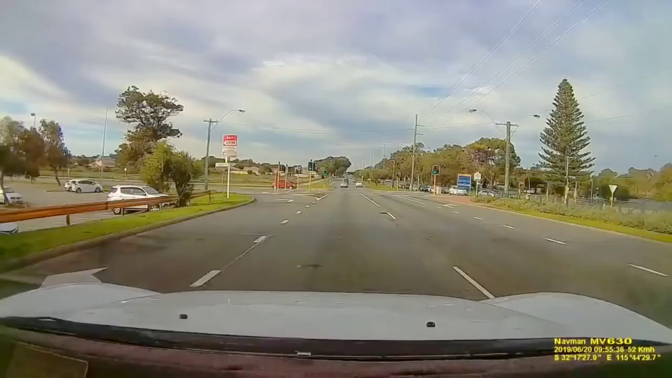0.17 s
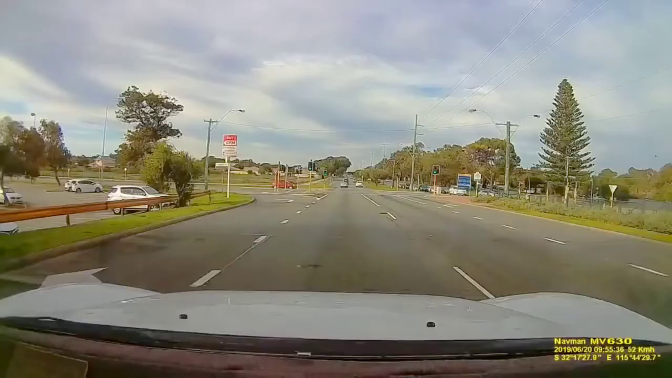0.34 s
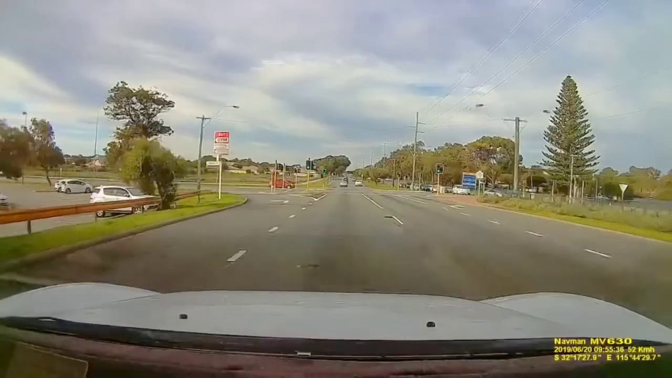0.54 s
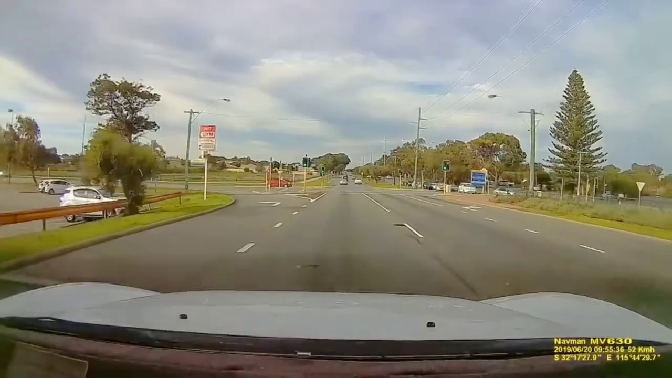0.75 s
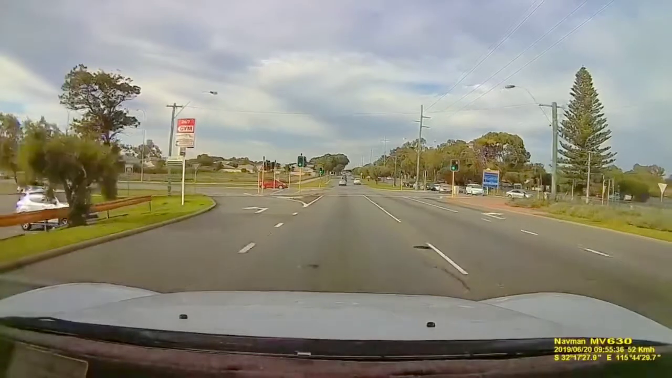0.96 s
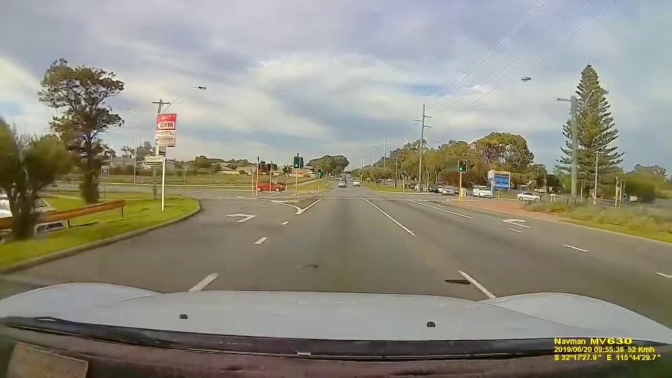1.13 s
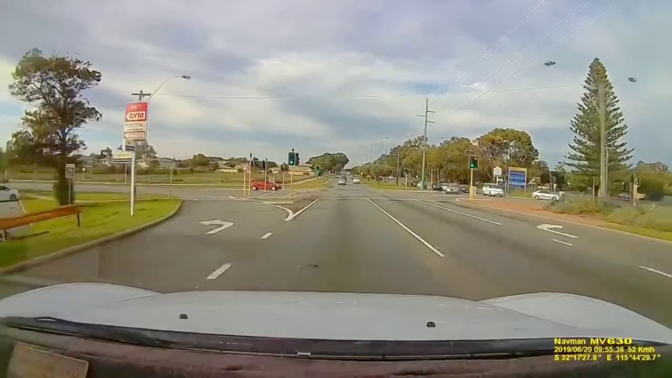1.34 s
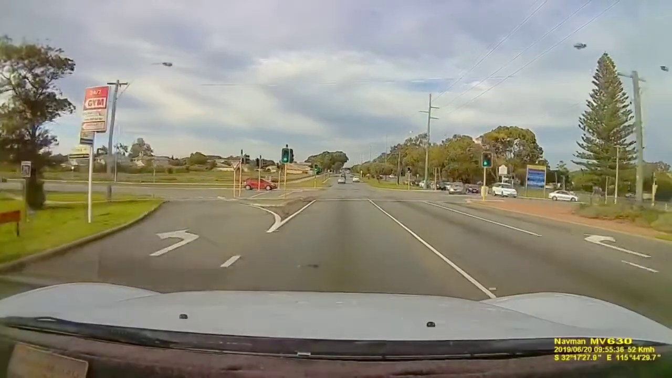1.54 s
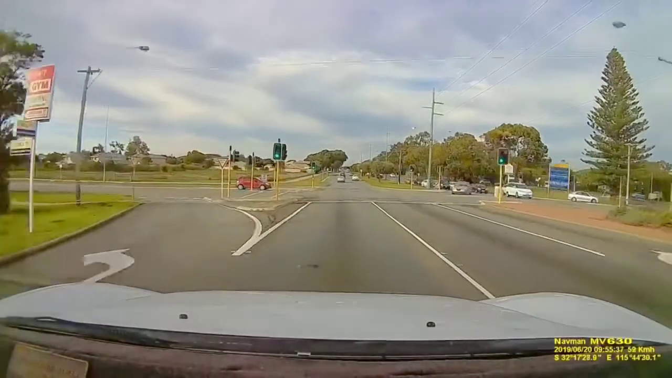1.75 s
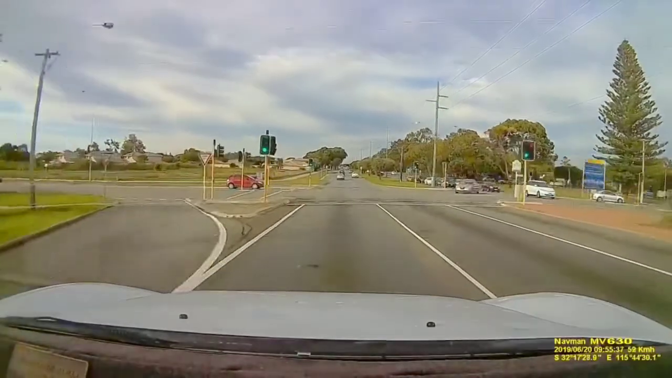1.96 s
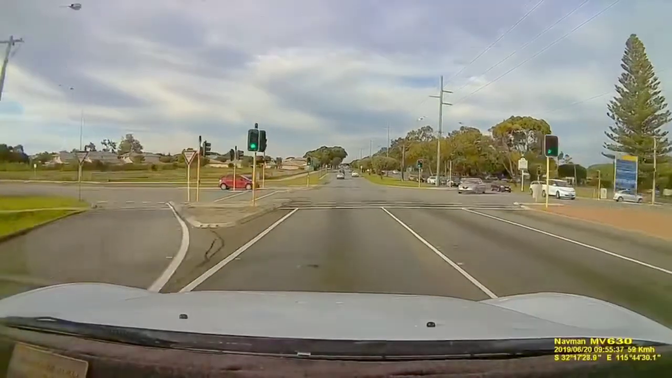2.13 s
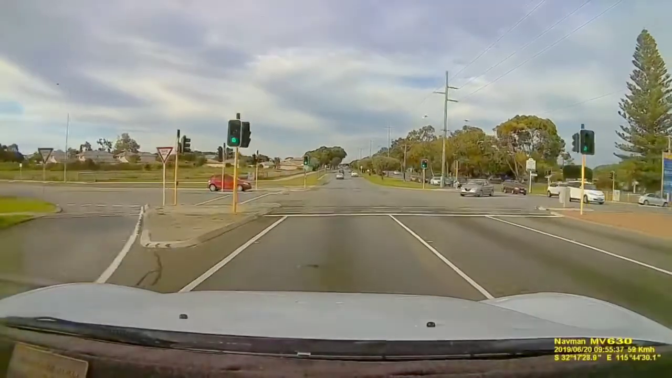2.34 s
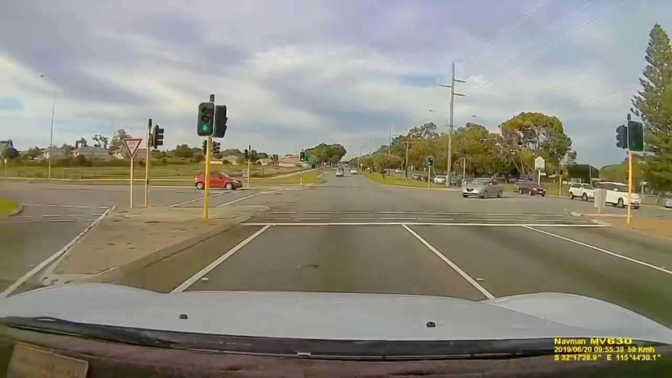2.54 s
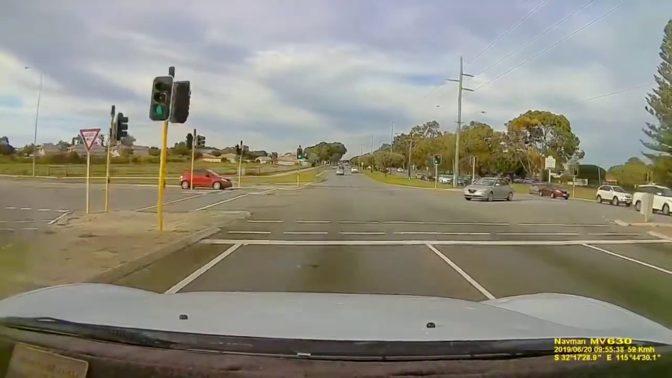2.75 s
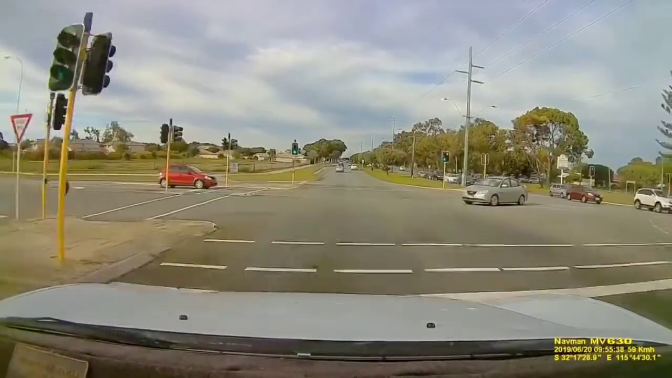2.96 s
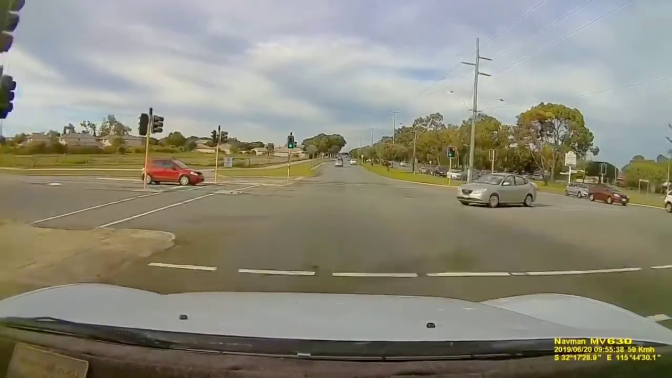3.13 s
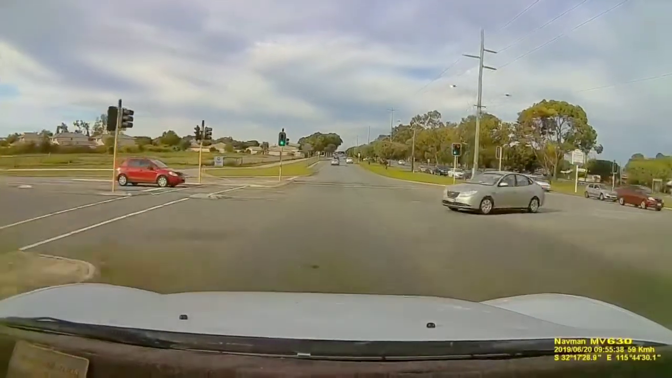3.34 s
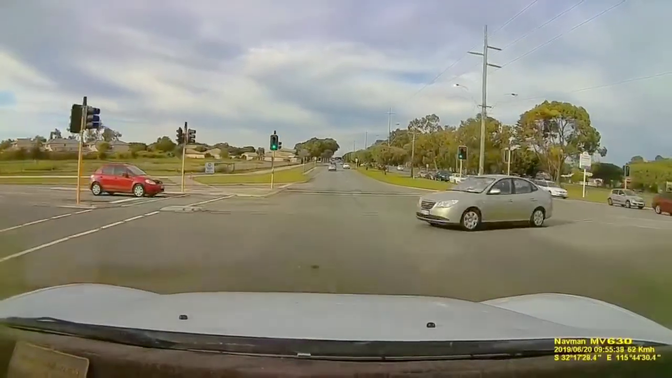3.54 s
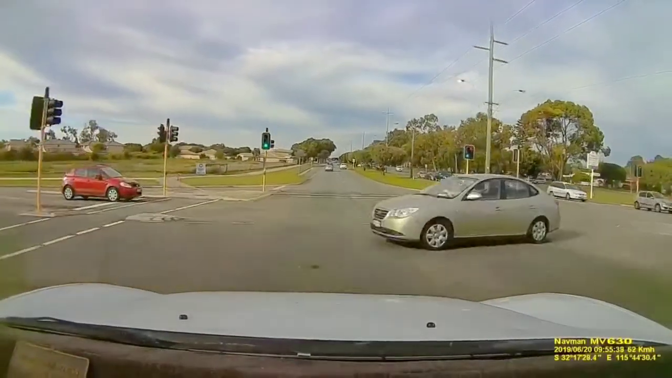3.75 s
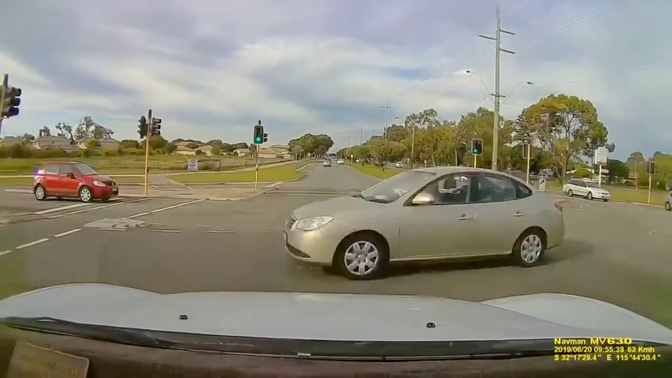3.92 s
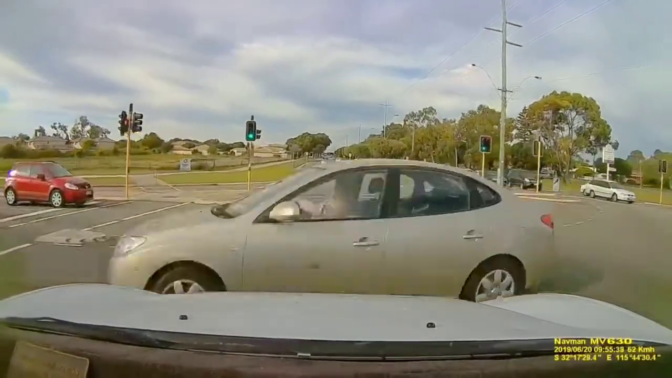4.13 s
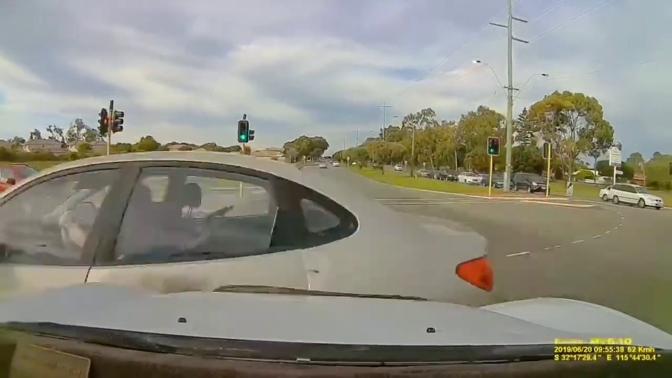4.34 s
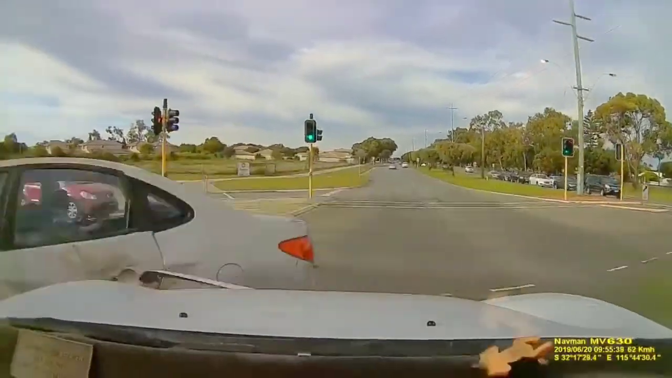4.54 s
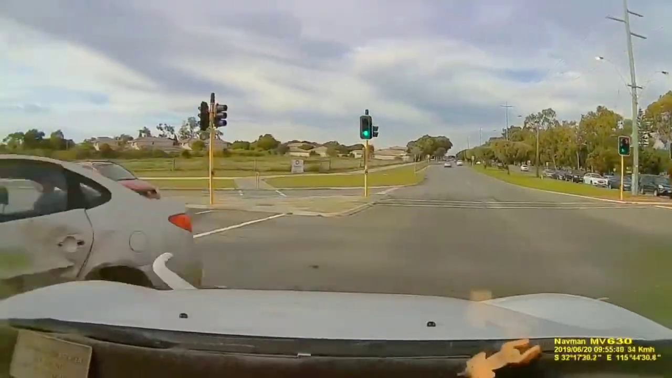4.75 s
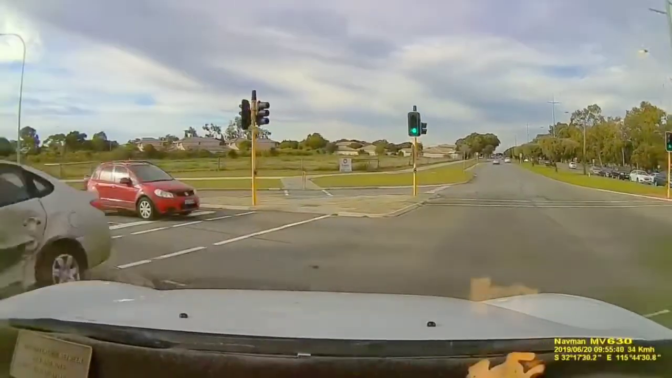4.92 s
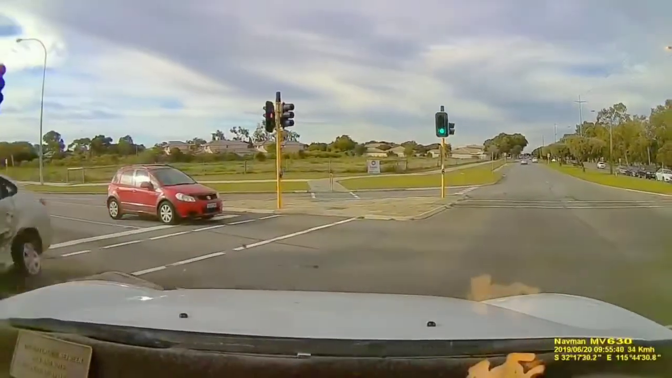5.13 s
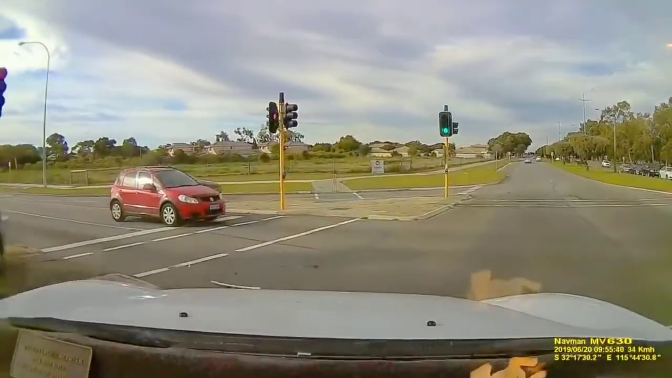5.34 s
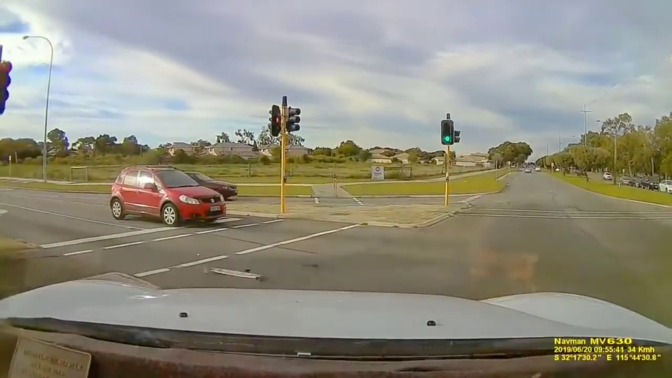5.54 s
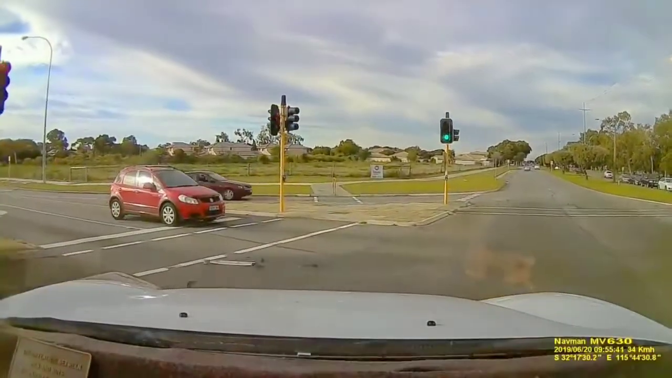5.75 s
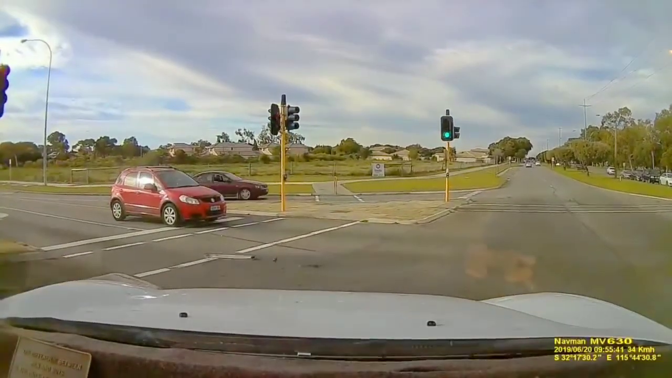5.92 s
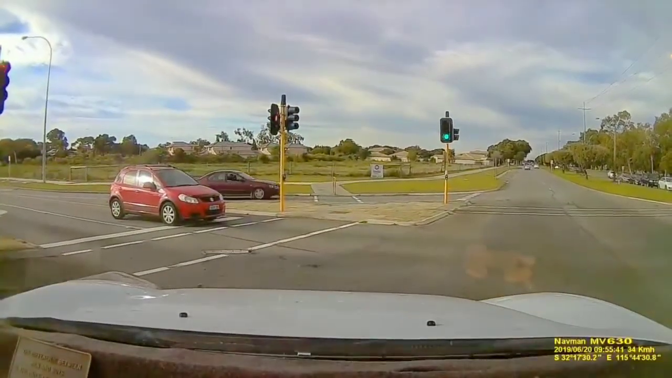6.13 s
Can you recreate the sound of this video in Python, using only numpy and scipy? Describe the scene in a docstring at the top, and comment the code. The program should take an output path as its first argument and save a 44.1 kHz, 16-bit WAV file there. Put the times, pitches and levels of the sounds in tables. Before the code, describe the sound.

Inside a moving car, muffled road roar turns into juddering, squealing braking, then a violent crash with crunching panels and loose parts rattling to a stop.

```python
"""Hard braking and a car crash, from inside

A small microphone at the windscreen hears tyres roar on the road; the car brakes hard, shudders and skids.
It hits another car: panels crunch and loose things knock about the cabin as it rolls to a stop.
Filtered noise makes the road and wreck, unsteady sines the squeal, bursts of tiny contacts the blows.
In set spells the overloaded microphone all but cuts out; jolts of the body free it."""
import sys
import numpy as np
from scipy import signal
from scipy.fft import rfft, irfft, next_fast_len
from scipy.io import wavfile
from scipy.ndimage import uniform_filter1d, map_coordinates

SR = 44100
rng = np.random.default_rng(int(sys.argv[2]) if len(sys.argv) > 2 else 0)


def waveform_to_disk(signal):
    """Save audio, clipped to [-1, 1], as 16-bit WAV at the path in sys.argv[1]."""
    frames = np.transpose(np.atleast_2d(signal))
    scaled = np.clip(frames, -1, 1) * 32767
    samples = np.round(scaled).astype(np.int16)
    wavfile.write(sys.argv[1], SR, samples)


N = 272641
IMPACT = 4.47  # s, the collision


def amp(db):
    """Amplitude for a level in dB."""
    return 10 ** (np.asarray(db) / 20)


def unit(x):
    """x at rms 1."""
    return x / np.sqrt(np.mean(x ** 2) + 1e-20)


def clock():
    """Time of each sample in seconds."""
    return np.arange(N) / SR


def after(s, rise):
    """A fade from 0 to 1 over rise seconds, half open at s."""
    return np.clip((clock() - s) / rise + .5, 0, 1)


def between(start, end, rise, fall):
    """A switch that is open from start to end."""
    return after(start, rise) * (1 - after(end, fall))


def wobble(rate):
    """A smooth random curve, rate knots a second."""
    knots = rng.standard_normal(int(N * rate / SR) + 4)
    return map_coordinates(knots, [clock() * rate])


def shape(points, hz):
    """Gain read from a spectrum table, on a log frequency axis."""
    f, db = np.transpose(points)
    return amp(np.interp(np.log(hz + 1), np.log(f + 1), db))


def resonances(modes, hz):
    """Summed peaks of (f/Hz, width/Hz, level/dB) modes."""
    return sum(amp(db) / np.hypot(1, 2 * (hz - f) / width) for f, width, db in modes)


def filtered(x, gain):
    """x through the causal, minimum-phase filter that has this gain over frequency."""
    m = 2 * next_fast_len(len(x) // 2 + 4096)
    log_gain = np.log(np.maximum(gain(np.fft.rfftfreq(m, 1 / SR)), 1e-6))
    # folding the cepstrum onto positive time makes the filter causal
    cepstrum = irfft(log_gain, m)
    cepstrum[1:m // 2] *= 2
    cepstrum[m // 2 + 1:] = 0
    response = np.exp(rfft(cepstrum))
    return irfft(rfft(x, m) * response, m)[:len(x)]


def coloured(x, points):
    """x with this spectrum, at rms 1."""
    return unit(filtered(x, lambda hz: shape(points, hz)))


def noise(points):
    """Steady noise with this spectrum, for the whole scene."""
    return coloured(rng.standard_normal(N), points)


def contacts(size, rate, rub):
    """Tiny impacts of uneven force, on average rate a second, over a share of rubbing noise."""
    ticks = (rng.random(size) < rate / SR) * rng.standard_normal(size)
    return unit(ticks) + rub * rng.standard_normal(size)


def cabin(x, wet=0.6, t60=0.1):
    """Glass and dashboard answer with a short, dense tail."""
    t = np.arange(SR // 10) / SR
    tail = rng.standard_normal(len(t)) * amp(-60 * t / t60)
    reflected = signal.fftconvolve(x, tail / np.linalg.norm(tail))[:len(x)]
    return unit(x + wet * reflected)


# How fast shaking builds up in the rumble, roar or clatter, and buzz layers: [dB/s] each
BUILD_DB_PER_S = (88, 91, 46.5)


def shaking(rows):
    """Gains of the low, middle and buzzing layers: each bout builds up, holds and falls away."""
    t, power = clock(), np.zeros((3, N))
    for s, hold, fall, *levels_db in rows:
        early, late = np.maximum(s - t, 0), np.maximum(t - s - hold, 0)
        for layer, (db, build) in enumerate(zip(levels_db, BUILD_DB_PER_S)):
            power[layer] += amp(db - build * early - fall * late) ** 2
    return np.sqrt(power)


# Airy hiss spectrum: f/Hz, level/dB [dB per Hz]
HISS = [(200, -20), (3000, -3), (7000, -5), (13000, -5)]


def microphone_hiss(level_db=-74):
    """The microphone's own faint, steady noise."""
    return amp(level_db) * noise(HISS)


# Shudders over a rough patch, then under braking:
# t/s, hold/s, fall/(dB/s), rumble level/dB, roar level/dB, buzz level/dB
SHUDDERS = [(2.77, 0.063, 112, -29, -48, -60.5), (3.38, 0.16, 133, -19, -24.5, -41),
            (3.67, 0.019, 100, -22, -30, -46), (3.83, 0.04, 78, -28.5, -35, -54.5),
            (4.39, 0.065, 60, -32.5, -39, -70)]


def shudders():
    """The car shakes over a rough patch, then in bouts under braking."""
    return shaking(SHUDDERS)


# Suspension rumble spectrum: f/Hz, level/dB [dB per Hz]
RUMBLE = [(20, -2), (48, 8.5), (75, -5.5), (118, 2.5), (150, 0.5), (190, 1), (340, -3), (440, -25),
          (750, -101.5)]
# Tyre tread roar spectrum: f/Hz, level/dB [dB per Hz]
ROAR = [(180, -24), (300, -10), (346, -1.5), (387, -10.5), (427, 2), (545, -6.5), (615, -6), (672, -4),
        (1140, -5), (1230, -8.5), (1740, -17.5), (2310, -32.5), (2530, -29), (3290, -44), (4200, -52.5),
        (5460, -83), (9240, -120)]
# Cabin drone and a faint electrical whine: f/Hz, level/dB
TONES = [(48.4, -74), (118.4, -48), (425.3, -56), (624.5, -50), (8516, -84)]
# Cruising levels at time zero, and their steady growth
RUMBLE_DB, ROAR_DB, AIR_DB, GAIN_DB_PER_S = -35, -36.5, -69.5, 1.0
# The wheels lock, and the rolling noise drops
LOCK_S, LOCK_TAKES_S, RUMBLE_DROP_DB, ROAR_DROP_DB = 3.28, 1, -6.5, -7.5


def road(shaken_rumble, shaken_roar):
    """Suspension rumble, tread roar, rushing air and cabin drone, up to the collision."""
    growth_db, locked = GAIN_DB_PER_S * clock(), after(LOCK_S, LOCK_TAKES_S)
    bounce = np.hypot(amp(RUMBLE_DB + growth_db + RUMBLE_DROP_DB * locked), shaken_rumble)
    tread = np.hypot(amp(ROAR_DB + growth_db + ROAR_DROP_DB * locked), shaken_roar)
    rumble = bounce * unit(amp(1.2 * wobble(24.76)) * noise(RUMBLE))
    roar = tread * amp(0.46 * wobble(14)) * noise(ROAR)
    air = amp(AIR_DB + growth_db) * noise(HISS)
    drone = np.zeros(N)
    for hz, db in TONES:
        phase = 2 * np.pi * hz * clock() + 0.76 * wobble(6.6)
        drone += amp(db) * np.sqrt(2) * np.sin(phase)
    return (rumble + roar + air + drone) * (1 - after(IMPACT, 0.016))


# Short squeaks and tyre chirps:
# t/s, length/s, f/Hz, glide/octaves, roughness [share of pitch], level/dB [at the peak of the swell]
SQUEAKS = [(3.152, 0.018, 4840, 0, 0.025, -49.5), (3.214, 0.013, 4850, -0.11, 0.019, -46),
           (3.301, .088, 1450, 0.5, 0.045, -20.5), (3.44, 0.035, 1975, 0.23, 0.088, -32.5),
           (3.519, 0.059, 1366, 0.02, 0.047, -21), (3.652, 0.015, 2480, -0.013, 0.052, -19.5),
           (3.822, 0.024, 2510, 0.08, 0.03, -34), (4.426, 0.037, 1620, .1, 0.04, -32.5),
           (5.572, 0.015, 2640, 0.18, 0.0495, -35)]


def squeaks():
    """Rubbing surfaces catch for a moment and sing on one rough, gliding note."""
    out, waver = np.zeros(N), wobble(600)
    for s, length, hz, glide, rough, db in SQUEAKS:
        progress = np.clip((clock() - s) / length, 0, 1)
        pitch = hz * 2 ** (glide * (progress - .5)) * (1 + rough * waver)
        swell = np.sin(np.pi * progress)
        out += amp(db) * np.sqrt(2) * swell * np.sin(2 * np.pi * np.cumsum(pitch) / SR)
    return out


# Rubber scrub spectrum: f/Hz, level/dB [dB per Hz]
SCRUB = [(410, -36.5), (700, -7), (854, -4), (949, -0.5), (1100, -2.5), (1320, -5), (1390, -3.5),
         (1600, -5), (1950, -22.5), (2590, -27.5), (3400, -40), (4420, -77), (7480, -120)]
# The slide keeps around one level and centre pitch until the collision
SKID_S, SKID_ATTACK_S, SKID_DB, SKID_HZ = 3.32, 0.17, -26.5, 1154


def skid(squeal=0.8, scrub=0.68, grit_db=-33):
    """Four tyres stick and slip at their own unsteady pitches, over rubber scrub and the hiss of grit."""
    tyres = np.zeros(N)
    for ratio in (.86, .96, 1.06, 1.18):
        hz = SKID_HZ * ratio * (1 + .04 * wobble(18) + .035 * wobble(220))
        tyres += amp(3.5 * wobble(35)) * np.sin(2 * np.pi * np.cumsum(hz) / SR)
    slide = squeal * unit(tyres) + scrub * noise(SCRUB)
    # grit level is relative to the skid
    grit = amp(grit_db + wobble(30)) * coloured(contacts(N, rate=2300, rub=0.72), HISS)
    return amp(SKID_DB) * (slide + grit) * between(SKID_S, IMPACT, SKID_ATTACK_S, 0.01)


# Broad crack spectrum of hard plastic: f/Hz, level/dB [dB per Hz]
CRACK = [(1060, -51), (1800, 1.5), (2040, -12.5), (2160, -5), (2370, -6.5), (2720, -2.5), (3080, -8.5),
         (3700, -12), (4400, -10.5), (4980, -16), (5730, -12.5), (7410, -21), (9810, -22), (10800, -21.5),
         (13000, -25.5)]
# Resonances of the plastic mount and trim: f/Hz, width/Hz, level/dB
TRIM = [(2134, 31, -2), (2850, 110, 3), (4530, 150, -10), (5740, 150, -19), (6750, 30, -5), (8700, 42, -14),
        (9500, 110, -6), (10780, 130, 1.5), (10500, 81, -14), (11500, 59, 5)]


def trim(x, ring=0.55):
    """Hard plastic: a broad crack with a few resonances standing out, answered by the cabin."""
    plastic = lambda hz: shape(CRACK, hz) * (1 + ring * resonances(TRIM, hz))
    return cabin(unit(filtered(x, plastic)))


# Rolling out: levels at the collision, and their common fade as the car slows
ROLL_BOOM_DB, ROLL_CLATTER_DB, ROLL_BUZZ_DB, ROLL_FADE_DB_PER_S = -33.5, -33, -49, 8.5


def rolling_out():
    """Gain that fades from the collision on."""
    return after(IMPACT, 0.017) * amp(-ROLL_FADE_DB_PER_S * np.maximum(clock() - IMPACT, 0))


def buzz(shaken, slide_db=-59):
    """Shaken trim chatters in clumps of contacts with single clinks; only a faint tremor fills the slide."""
    chatter = trim(contacts(N, rate=1500, rub=0.9) + .5 * contacts(N, rate=91, rub=0))
    clumps = amp(2.0 * wobble(45))
    sliding = amp(slide_db) * between(SKID_S, IMPACT, SKID_ATTACK_S, 0.015)
    tremor = sliding + amp(ROLL_BUZZ_DB) * rolling_out()
    return np.hypot(shaken, tremor) * clumps * chatter


# Heaves of the wreck after the collision, and again as it stops:
# t/s, hold/s, fall/(dB/s), boom level/dB, clatter level/dB, buzz level/dB
HEAVES = [(4.74, 0.13, 50, -23, -22, -33), (5.26, 0.086, 60, -35, -60, -68),
          (5.57, 0.083, 118, -30, -31.5, -43.5)]


def heaves():
    """The wreck heaves after the collision, and again as it stops."""
    return shaking(HEAVES) * after(IMPACT, 0.017)


# Spectra of the body's boom, its sway on the springs and broken parts: f/Hz, level/dB [dB per Hz]
BOOM = [(20, 3), (70, -4.5), (140, 8), (260, -4.5), (400, -6), (750, -40.5)]
SWAY = [(20, 7), (50, 14), (80, 2), (160, -53)]
CLATTER = [(150, -25.5), (250, 3.5), (301, -1), (387, -2), (537, 0.5), (555, -4), (605, 1.5), (661, -1),
           (698, 6), (753, -5), (1000, -0.5), (1480, -3.5), (1890, -28.5), (2820, -31), (3400, -42),
           (4420, -66), (7480, -120)]


def wreck(heaved_boom, heaved_clatter, sway_db=-24.5):
    """The body sways on its springs and booms; broken parts clatter as the car slows."""
    heave = np.hypot(heaved_boom, amp(ROLL_BOOM_DB) * rolling_out())
    scatter = np.hypot(heaved_clatter, amp(ROLL_CLATTER_DB) * rolling_out())
    lurch = amp(2.5 * wobble(25))
    pieces = contacts(N, rate=400, rub=.55)
    boom = heave * lurch * noise(BOOM)
    sway = amp(sway_db) * np.sqrt(heave) * noise(SWAY)  # dies away more slowly than the boom
    clatter = scatter * amp(1.1 * wobble(35)) * coloured(pieces, CLATTER)
    return (boom + sway + clatter) * after(IMPACT, 0.017)


def burst(x, length, t60):
    """The end of x at rms 1 while the contact lasts, then dying away."""
    t = np.arange(SR // 5) / SR
    envelope = amp(-60 * np.maximum(t - length, 0) / t60) * (1 - np.exp(-t / .0003))
    x = x[-len(t):] * envelope
    return x / np.sqrt(np.mean(x[t <= length + .001] ** 2))


# Spectra of the body's thud and the panels' knock: f/Hz, level/dB [dB per Hz]
THUD = [(25, 0), (70, -17.5), (140, 2), (300, -2), (420, -7), (800, -55)]
KNOCK = [(180, -15.5), (300, -1), (402, 0.5), (561, -2.5), (675, -1.5), (1120, -4.5), (1270, -11.5),
         (1440, -2), (1680, -15), (1900, -23), (2470, -66), (4180, -120)]
# Resonances of the body panels: f/Hz, width/Hz, level/dB
PANELS = [(344, 93, -3), (680, 30, -12), (960, 15, -5), (1063, 11, 3.5), (1322, 116, -3)]


def blows(rows, weight_db, thud_db_per_octave=-5, thud_t60=0.11, knock_t60=0.068, crack_t60=0.071,
          octaves=0.85, ring=2.05):
    """Crushing contacts knock panels, crack plastic and thud the body, more so for a low blow."""
    size = SR // 4  # the noise runs in before the part that burst() keeps
    out = np.zeros(N + SR)
    for s, length, db, knock_hz, crack_db in rows:
        # the place that is struck favours the panel resonances near one pitch
        place = lambda hz: np.exp(-(np.log2((hz + 1) / knock_hz) / octaves) ** 2 / 2)
        panel = lambda hz: shape(KNOCK, hz) * (1 + ring * resonances(PANELS, hz)) * place(hz)
        thud = burst(coloured(rng.standard_normal(size), THUD), length, thud_t60)
        knock = burst(filtered(contacts(size, rate=900, rub=.45), panel), length, knock_t60)
        crack = burst(trim(contacts(size, rate=800, rub=.55)), length, crack_t60)
        # thud level relative to the knock
        thud_db = weight_db + thud_db_per_octave * np.log2(knock_hz / 1000)
        blow = amp(db) * (knock + amp(thud_db) * thud) + amp(crack_db) * crack
        out[round(s * SR):][:len(blow)] += blow
    return out[:N]


# Loose parts knocking about: t/s, contact length/s, knock level/dB, favoured f/Hz, crack level/dB
KNOCKS = [(2.656, 0.028, -39, 910, -53.5), (3.134, 0.012, -42, 830, -48), (3.282, 0.007, -25, 1700, -47),
          (3.314, 0.01, -24.5, 1450, -38.5), (3.703, 0.004, -21.5, 730, -54),
          (3.786, 0.0058, -25.5, 1280, -39.5), (4.899, 0.014, -8.5, 620, -33),
          (4.928, 0.0078, -7, 820, -23.5), (5.003, 0.01, -22.5, 950, -45.5), (5.115, 0.011, -17, 900, -37),
          (5.536, 0.0028, -26, 1000, -33), (5.576, 0.023, -27, 950, -38), (5.641, 0.0038, -28, 1320, -53),
          (5.739, 0.014, -27, 1130, -39), (5.856, 0.0063, -38.5, 870, -53), (5.895, 0.022, -31, 540, -56),
          (6.053, 0.0098, -44, 1390, -56)]


def knocks():
    """Loose parts knock about the cabin, with little thud."""
    return blows(KNOCKS, weight_db=-25.5)


# Jolts through the whole body: t/s, contact length/s, knock level/dB, favoured f/Hz, crack level/dB
JOLTS = [(3.243, 0.012, -30.5, 396, -60), (3.378, 0.013, -25, 600, -32), (3.491, 0.0083, -22.5, 640, -40),
         (3.528, 0.0089, -22.5, 600, -35.5), (3.574, 0.0065, -25, 820, -35), (3.65, 0.0088, -28, 1160, -43),
         (3.665, 0.015, -26.5, 695, -36), (4.474, 0.0053, -8.5, 484, -23), (4.501, 0.0037, -8.5, 730, -21),
         (4.531, 0.0036, -12.5, 1190, -31), (4.5511, 0.0041, -13.5, 900, -24.5),
         (4.603, 0.0041, -17.5, 327, -33.5), (4.6304, 0.0069, -10.5, 1250, -21.5),
         (4.667, 0.02, -16, 716, -30.5), (4.709, 0.014, -14.5, 920, -29.5), (4.734, 0.012, -18, 920, -29),
         (4.832, 0.02, -11, 676, -25.5), (4.872, 0.016, -13, 930, -24.5),
         (5.206, 0.0022, -14.5, 580, -33.5), (5.214, 0.011, -18.5, 740, -33), (5.237, 0.013, -25, 442, -51),
         (5.616, 0.012, -17.5, 1160, -27)]


def jolts():
    """Braking and crushing blows jolt the whole body, with a heavy thud."""
    return blows(JOLTS, weight_db=-1.5)


def softened(x, dull_hz=4000):
    """As the car slows, the contacts grow softer and lose their top."""
    soft = signal.lfilter(*signal.butter(1, dull_hz, fs=SR), x)
    return x + after(5.32, 0.8) * (soft - x)


def scene():
    """Everything heard at the windscreen, over the microphone's own faint hiss."""
    rumble, roar, shudder_buzz = shudders()
    boom, clatter, heave_buzz = heaves()
    driving = road(rumble, roar) + skid() + squeaks()
    hits = jolts() + knocks()
    rattling = softened(hits + buzz(shudder_buzz + heave_buzz))
    return (driving + rattling + wreck(boom, clatter) + microphone_hiss())[None]


# Spells of overload, in which only a jolt frees the microphone: start t/s, end t/s
OVERLOADS = [(3.480, 3.508), (3.644, 3.667), (4.456, 4.737), (5.226, 5.265)]


def overload(x, leak_db=-48, thump_time=0.00075, thump_db=-1):
    """A pinned diaphragm passes almost nothing; it sticks with a low thump scaled by the sound's level."""
    spells = sum(between(start, end, 0.0014, 0.00017) for start, end in OVERLOADS)
    freed = sum(between(s, s + length, 0.00017, 0.0014) for s, length, *_ in JOLTS)
    pinned = np.clip(spells - freed, 0, 1)
    force = np.sqrt(np.abs(uniform_filter1d(x ** 2, size=256)))
    sticking = force * np.maximum(np.diff(pinned, prepend=0), 0)
    u = np.arange(SR // 50) / SR / thump_time
    thumps = signal.fftconvolve(sticking, u * np.exp(1 - u))[:N]
    return x * (1 - pinned + amp(leak_db) * pinned) + amp(thump_db) * thumps


START, TOP_HZ = 0.522, 13250  # s of silence before the sound; upper limit of the microphone


def record(dry, bass_hz=115):
    """The sound starts abruptly; the microphone overloads, sheds bass, rounds off peaks and cuts the top."""
    x = overload(dry[0] * after(START, 0.0036))
    x = signal.lfilter(*signal.butter(1, bass_hz, "highpass", fs=SR), x)
    x = x / (1 + np.abs(x) ** 6) ** (1 / 6)
    hz = np.fft.rfftfreq(N, 1 / SR)
    top_cut = np.clip((TOP_HZ - hz) / 300 + .5, 0, 1)
    return irfft(rfft(x) * top_cut, N)[None]


dry = scene()
out = record(dry)
waveform_to_disk(out)
```